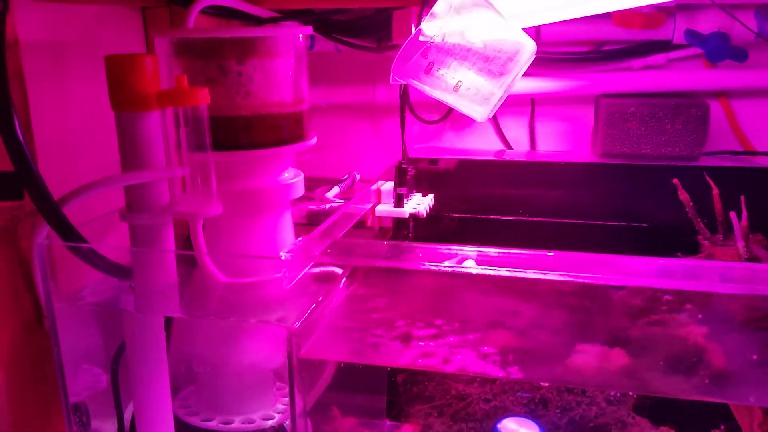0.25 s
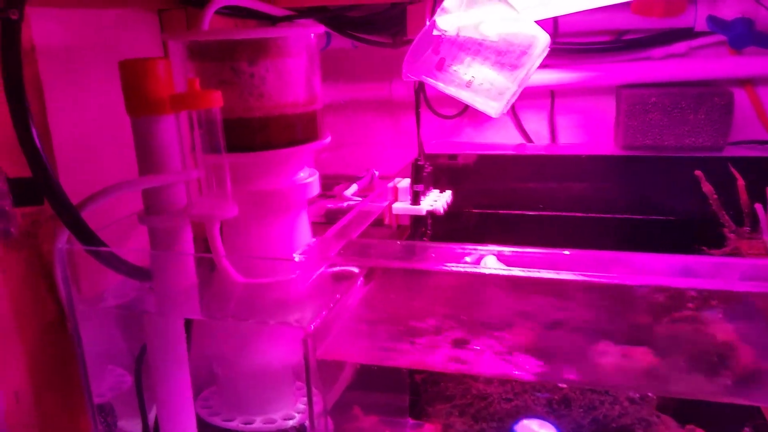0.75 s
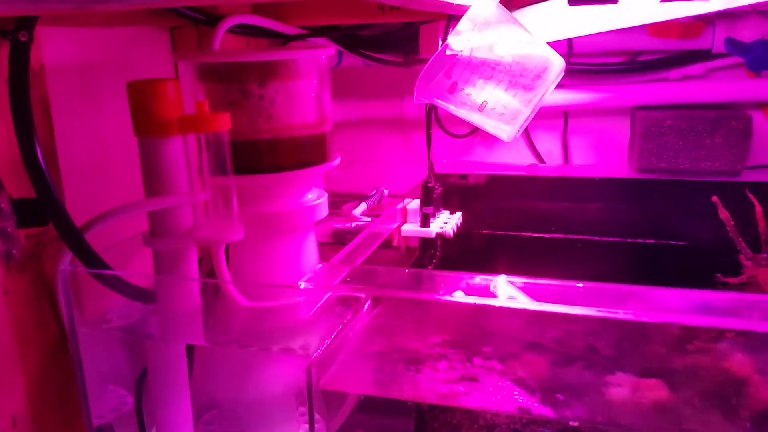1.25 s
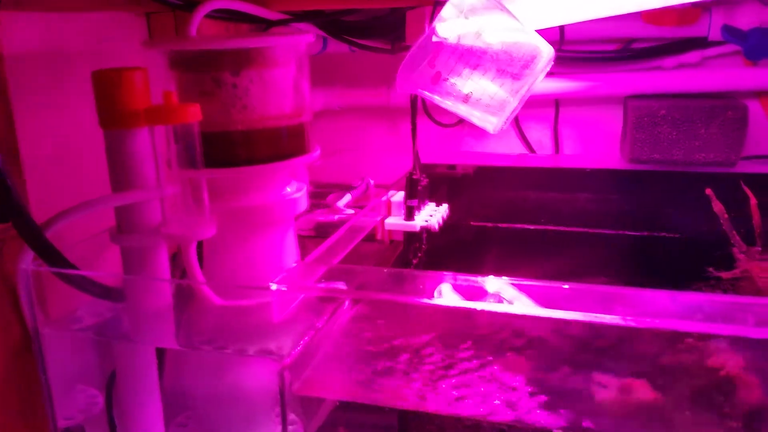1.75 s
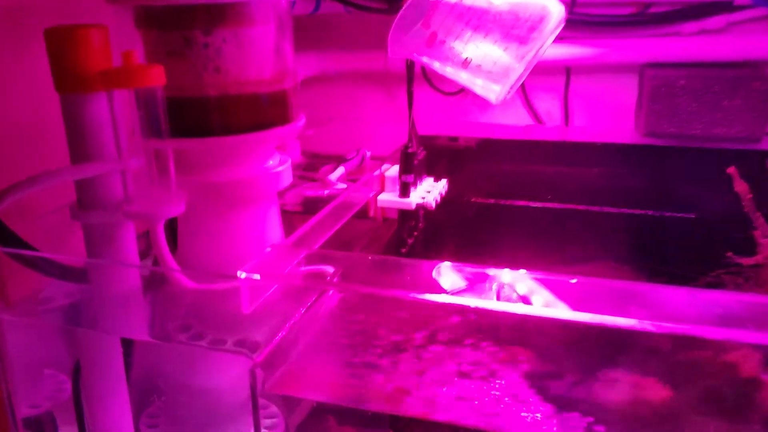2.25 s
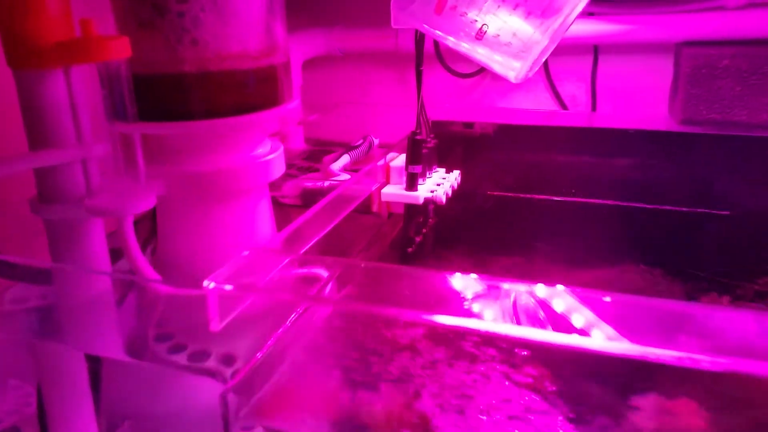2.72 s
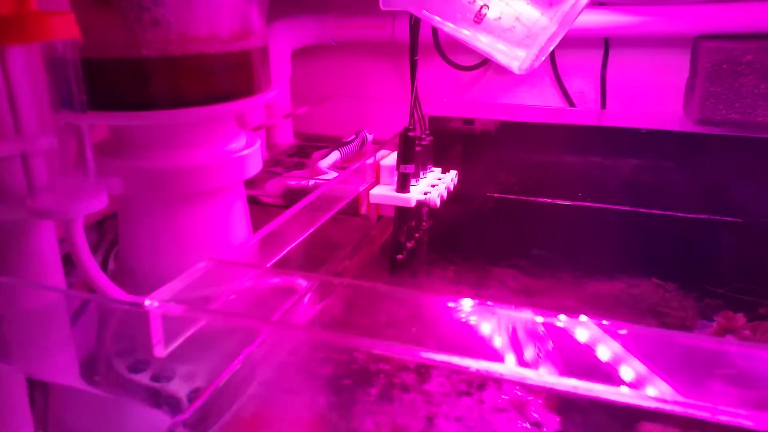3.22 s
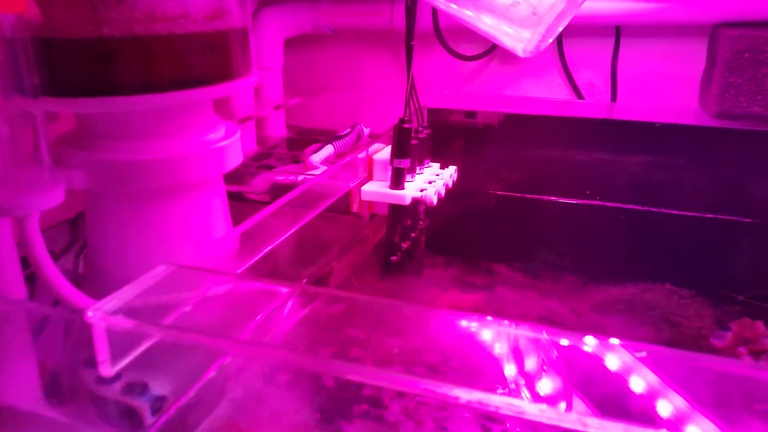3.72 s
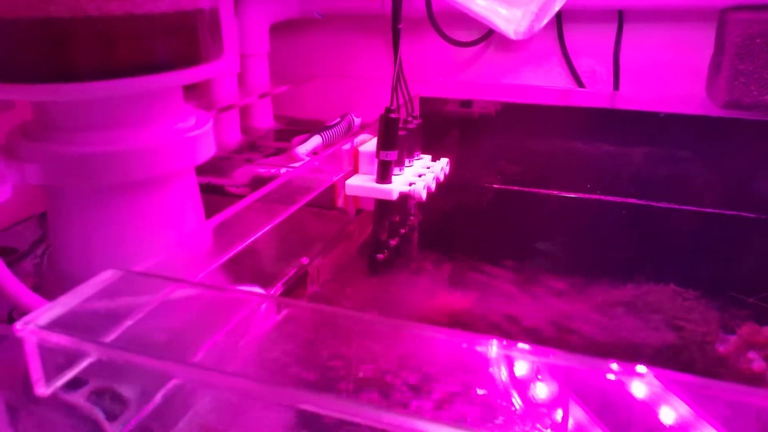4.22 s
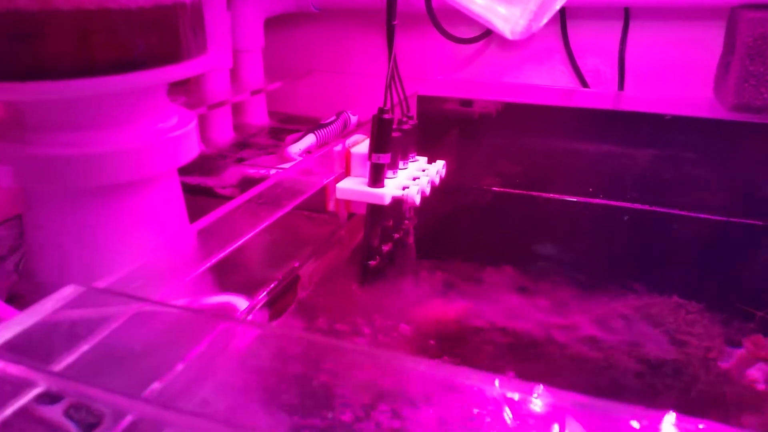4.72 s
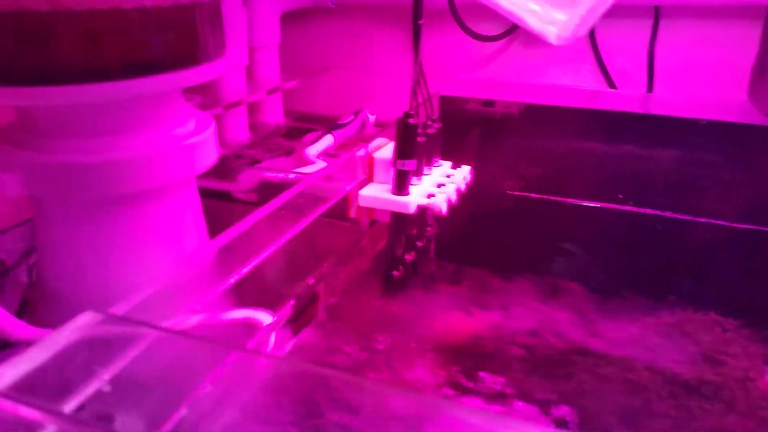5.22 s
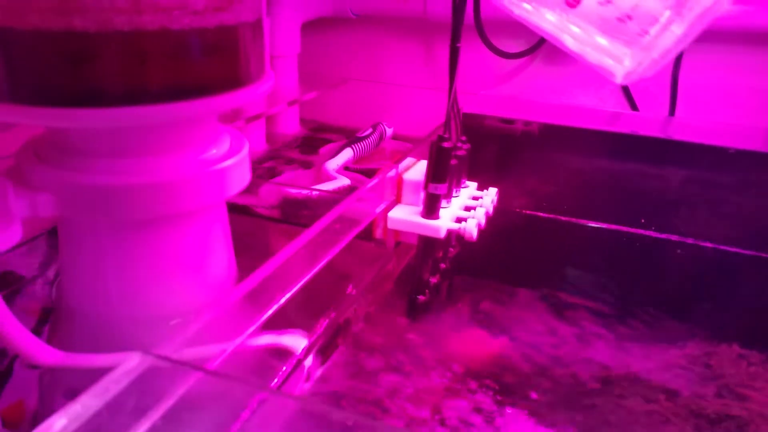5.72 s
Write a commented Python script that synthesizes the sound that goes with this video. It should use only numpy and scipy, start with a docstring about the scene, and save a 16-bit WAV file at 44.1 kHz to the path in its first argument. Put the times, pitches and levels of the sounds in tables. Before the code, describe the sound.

Water bubbles and fizzes in an aquarium sump over a steady pump hum, broken by a sharp click and soft handling bumps.

```python
"""An aquarium sump in its cabinet, heard from a hand-held camera that moves in towards the water.
From the start a mains pump and a skimmer pump beat under a thin fan tone, water churns, bubbles and
fizzes, and the skimmer's air intake hisses on the left. After one second a finger knocks the right
microphone, and everything sinks for about a second. The water then goes on growing, and from three
seconds on the drain gulps air, among clear plops and soft bumps of the hand on the camera."""
import sys
import numpy as np
from scipy import signal
from scipy.fft import rfft, irfft
from scipy.io import wavfile
from scipy.ndimage import uniform_filter1d, minimum_filter1d

SR = 44100
rng = np.random.default_rng(int(sys.argv[2]) if len(sys.argv) > 2 else 0)


def wrap_up_sound(samples):
    """Save the sound to the file named by the first command line argument, as 16-bit audio."""
    columns = np.atleast_2d(samples).T
    # keep every value between -1 and 1, then stretch to whole-number steps
    tamed = np.clip(columns, -1, 1)
    steps = np.round(tamed * 32767).astype(np.int16)
    wavfile.write(sys.argv[1], SR, steps)


N = 263277
TIME, FREQS = np.arange(N) / SR, np.fft.rfftfreq(N, 1 / SR)

# Rotor partials: (multiple of rotor speed [-], relative left level [dB], relative right level [dB])
MAINS_PARTIALS = [(2, 14, 13.5), (3, -2.5, 5.5), (4, -5, -11)]
SKIMMER_PARTIALS = [(2, 4.8, -3.5), (3, 12.7, 10)]
WHINE_PARTIALS = [(12.0, -1, -3), (15.1, -20, -19), (21, -15, -29), (21.95, -16, -18), (24, -15, -10),
                  (25, -10.5, -11.5), (26.05, -8.5, -16), (27, -13, -16), (39.1, -13, -14)]  # the skimmer's high orders
FAN_PARTIALS = [(1, -4.5, -2.5), (2, -16, -20), (3, -7.5, -10.5)]
# Noise spectral densities: (frequency [Hz], relative left level [dB], relative right level [dB])
RUMBLE_SPECTRUM = [(8, -24, -31), (22, -6.5, -28), (40, -13, -9), (67.4, 1, -3), (93, -11, -1.5),
                   (146, -2, -4), (167.5, -4.5, -3), (223, -17, -17), (343, -18, -17.5), (417, -33.5, -24),
                   (710, -67, -79)]
CHURN_SPECTRUM = [(152, -23, -21), (260, 9, -5), (346, 3, -0.5), (423, -10.5, 2.5), (487, 4.5, -4),
                  (622, 2, 2.5), (697, 0.5, -7.5), (1090, 3.5, -3), (1220, 3.5, -2.5), (1600, 0, -0.5),
                  (1640, -16, 2.5), (1700, 4.5, -1), (2220, -9.5, -7.5), (3550, -27, -36.5)]
INTAKE_SPECTRUM = [(1950, -33, -46), (2370, -14, -34), (2410, -8, -20), (2930, -8.5, -23), (3580, -25, -33),
                   (3733, -13, -23), (4104, -1, -28), (4490, 1, -28), (4960, -3.5, -20), (5510, -11, -38),
                   (6660, -74, -66), (12000, -53, -48)]
FIZZ_SPECTRUM = [(1500, -8, -26), (2560, 1.5, -2.5), (3420, 1, -9), (4120, -1.5, -2), (5420, 8, -10),
                 (6450, 1, -9.5), (7480, -7.5, -15.5), (8820, -6, 0), (9350, 2.5, -2), (11200, -0.5, 9),
                 (12900, 0.5, 1.5), (16000, -4.5, 2)]
# Likeness of the two microphone signals: (frequency [Hz], signed coherence [-])
COHERENCE = [(30, -0.4), (60, 0.66), (110, 0.34), (160, 0.87), (270, 0.52), (450, 1), (740, 0.28),
             (1220, -0.58), (2010, -0.059), (3300, -0.0041)]
# Spits of spray: (time [s], level [dB])
SPRAY_SPITS = [(0.382, -58), (5.517, -52)]
# Gulps of air in the drain: (time [s], peak level [dB])
DRAIN_GULPS = [(3.266, -22), (4.016, -27), (4.942, -24), (5.542, -22), (5.763, -21.5)]
# Single ringing bubbles: (time [s], peak level [dB], frequency [Hz])
BUBBLE_PLOPS = [(3.115, -47, 468), (3.164, -48.5, 1320), (4.015, -46, 727), (5.464, -40, 1067),
                (5.827, -46, 1320), (5.828, -48, 2010)]
# Hand on the camera body: (time [s], level before filtering [dB])
HAND_BUMPS = [(0.5006, -6.5), (1.413, -18), (3.913, -5), (3.964, -7), (4.666, -7), (5.798, -9.5)]
# Finger on the right microphone: (time [s], level before filtering [dB], rise [s], length [s])
FINGER_KNOCKS = [(0.9877, -15, .00004, 0.014), (1.0216, 12.5, 0.00006, 0.0045)]

MAINS_HZ, SKIMMER_HZ, FAN_HZ = 60, 44.56, 580.5
APPROACH_DB_PER_S, DIP_DB = 1.15, -12.5  # each layer takes its own multiple of these


def amp(db):
    """Amplitude ratio: tenfold for every 20 dB."""
    return 10 ** (np.asarray(db) / 20)


def unit_rms(x):
    """Normalisation to a mean power of 1."""
    return x / np.sqrt(np.mean(x ** 2) + 1e-20)


def spectrum(table):
    """Interpolation of a table's columns along a logarithmic frequency axis."""
    hz, *columns = np.transpose(table)
    return np.array([np.interp(np.log(FREQS + 1), np.log(hz + 1), column) for column in columns])


def add(mix, start_s, sound):
    """Superposition: a sound adds to the mix from start_s on."""
    part = mix[:, round(start_s * SR):][:, :sound.shape[-1]]
    part += sound[..., :part.shape[1]]


def drift(rate_hz):
    """Random modulation: noise of rms 1, low-passed at about rate_hz."""
    low_pass = np.exp(-(FREQS / rate_hz) ** 2) * (FREQS > 0)
    return unit_rms(irfft(rfft(rng.standard_normal(N)) * low_pass, N))


def coloured(pair, colour):
    """Partial coherence: two independent noises are blended, then spectrally shaped."""
    left, independent = rfft(pair)
    coherence = np.clip(spectrum(COHERENCE)[0], -1, 1)
    right = coherence * left + np.sqrt(1 - coherence ** 2) * independent
    return unit_rms(irfft(np.array([left, right]) * amp(spectrum(colour)), N))


def dip_depth(start_s=1.027, step=0.16, fall_s=0.53, hold_s=0.29, recover_s=0.33):
    """Envelope of the dip at the knock, 0 to 1: step, linear fall, hold, exponential recovery."""
    age = TIME - start_s
    fall = (age > 0) * (step + (1 - step) * np.clip(age / fall_s, 0, 1))
    return fall * np.exp(-np.maximum(age - fall_s - hold_s, 0) / recover_s)


def level(end_db, near, dip, leftward=0):
    """Level rises as distance shrinks; near and dip weight the approach and the brief drop."""
    approach_db = APPROACH_DB_PER_S * (TIME - TIME[-1])
    approach_weight = near + leftward * np.array([[1], [-1]])
    return amp(end_db + approach_weight * approach_db + dip * DIP_DB * dip_depth())


def rotor(speed_hz, partials, wander, flutter_db, flutter_hz, lag_s):
    """Rotor tones lock to the shaft speed; water on the blades modulates frequency and amplitude."""
    turns = np.cumsum(speed_hz * (1 + wander * drift(2.96))) / SR
    lag = np.array([[lag_s], [0]])  # the sound reaches the left microphone later
    out = np.zeros((2, N))
    for order, left_db, right_db in partials:
        tone = np.sin(2 * np.pi * (order * (turns - speed_hz * lag) + rng.random()))
        out += np.sqrt(2) * amp([[left_db], [right_db]]) * tone * amp(flutter_db * drift(flutter_hz))
    return out


def turbulence(colour, per_s, spread_db, burst_db, surge_db, surge_hz):
    """Turbulent flow radiates broadband noise with tiny uneven bursts, surging as a whole."""
    impulses = (rng.random((2, N)) < per_s / SR) * rng.choice([-1, 1], (2, N))
    sizes = amp(spread_db * np.minimum(rng.exponential(1, (2, N)), 4))
    drive = rng.standard_normal((2, N)) + amp(burst_db) * unit_rms(impulses * sizes)
    return coloured(drive, colour) * amp(surge_db * drift(surge_hz))


def spray(hz, width_hz, half_s):
    """Fine spray spits a high band of noise under short Gaussian envelopes."""
    band = np.exp(-((FREQS - hz) / width_hz) ** 2)
    envelope = sum(amp(db) * np.exp(-((TIME - s) / half_s) ** 2) for s, db in SPRAY_SPITS)
    return envelope * unit_rms(irfft(rfft(rng.standard_normal((2, N))) * band, N))


def slosh(boost_db, delay_s, half_s):
    """Amplitude modulation of the churn: each gulp stirs the water in proportion to its size."""
    return 1 + sum(amp(boost_db + db) * np.exp(-((TIME - s - delay_s) / half_s) ** 2)
                   for s, db in DRAIN_GULPS)


def bubble(hz, cycles, glide, onset):
    """An air pocket is a damped oscillator whose pitch rises as it nears the surface."""
    age = np.arange(int(5 * cycles / hz * SR)) * hz / (SR * cycles)  # in decay time constants
    phase = 2 * np.pi * cycles * (age + glide * age ** 2 / 2)
    ring = np.sin(phase) * np.exp(-age) * (1 - np.exp(-age / onset))
    return ring / abs(ring).max()


def bubbling(per_s, low_hz, high_hz, cycles, spread_db, size_count=40):
    """Bubbles resonate at random all over the surface; larger ones ring lower and louder."""
    out = np.zeros((2, N))
    for hz in np.geomspace(low_hz, high_hz, size_count):
        births = rng.random(N) < per_s / size_count / SR
        strengths = amp(spread_db * np.minimum(rng.exponential(1, N), 3.5))
        pan = rng.uniform(0.1, 0.76)
        rings = signal.oaconvolve(births * strengths, bubble(hz, cycles, glide=0.035, onset=0.037))[:N]
        out += np.array([[np.cos(pan)], [np.sin(pan)]]) * rings * (low_hz / hz) ** 0.67
    return unit_rms(out)


def gulps_and_plops():
    """Damping sets the ring: heavy in the drain's deep gulps, light in the clear plops."""
    out = np.zeros((2, N))
    for s, db in DRAIN_GULPS:
        add(out, s, amp(db) * bubble(hz=115.8, cycles=0.94, glide=0.005, onset=0.81))
    for s, db, hz in BUBBLE_PLOPS:
        add(out, s, amp(db) * bubble(hz, cycles=13.5, glide=0.0156, onset=0.04))
    return out


def push(db, rise_s, length_s, side):
    """Contact makes a one-way pressure pulse, shared between left (side 0) and right (side 1)."""
    t = np.arange(4096) / SR
    pulse = (1 - np.exp(-(t / rise_s) ** 2)) * np.exp(-(t / length_s) ** 4)
    return amp(db) * np.array([[1 - side], [side]]) * pulse


def touches(bass_cuts_hz, overload_db, port_hz, port_loss, top_lift):
    """Transient response: the microphone's bass cut swings each pulse back; the hardest overloads it."""
    pressure = np.zeros((2, N))
    for s, db, rise_s, length_s in FINGER_KNOCKS:
        add(pressure, s, push(db, rise_s, length_s, side=1))
    for s, db in HAND_BUMPS:
        add(pressure, s, push(db, rise_s=0.0019, length_s=0.0055, side=0.055))
    cuts = np.vstack([signal.butter(1, hz, "high", fs=SR, output="sos") for hz in bass_cuts_hz])
    clipped = np.clip(signal.sosfilt(cuts, pressure), -amp(overload_db), amp(overload_db))
    # the microphone's port lifts the very top and absorbs a wide treble band below it
    lifted = clipped + top_lift * np.diff(clipped, axis=1, prepend=0)
    return lifted - port_loss * signal.lfilter(*signal.iirpeak(port_hz, 1, fs=SR), lifted)


def scene():
    """Superposition: water and pumps grow on approach, the fan barely, the intake not at all."""
    hum = rotor(MAINS_HZ, MAINS_PARTIALS, wander=0.0003, flutter_db=1.0, flutter_hz=5, lag_s=0.0003)
    hum += rotor(SKIMMER_HZ, SKIMMER_PARTIALS, wander=0.0008, flutter_db=1.4, flutter_hz=8, lag_s=0.0003)
    whine = rotor(SKIMMER_HZ, WHINE_PARTIALS, wander=0.0007, flutter_db=1.3, flutter_hz=8, lag_s=0.0003)
    fan = rotor(FAN_HZ, FAN_PARTIALS, wander=0.0005, flutter_db=1.8, flutter_hz=5, lag_s=0.0001)
    rumble = turbulence(RUMBLE_SPECTRUM, per_s=60, spread_db=4, burst_db=-8, surge_db=1.5, surge_hz=9.1)
    churn = turbulence(CHURN_SPECTRUM, per_s=350, spread_db=3.5, burst_db=-4.5,
                       surge_db=1.02, surge_hz=27)
    churn *= slosh(boost_db=17, delay_s=0.0082, half_s=0.012)
    bubbles = bubbling(per_s=130, low_hz=280.1, high_hz=1862, cycles=7.7, spread_db=4.5)
    gurgle = bubbling(per_s=70, low_hz=429, high_hz=492.5, cycles=23, spread_db=5.5, size_count=8)
    intake = turbulence(INTAKE_SPECTRUM, per_s=2200, spread_db=-4, burst_db=-4.5,
                        surge_db=0.7, surge_hz=12)
    fizz = turbulence(FIZZ_SPECTRUM, per_s=2600, spread_db=5.5, burst_db=-5.5, surge_db=1, surge_hz=38)
    sump = (hum * level(end_db=-49.0, near=0.92, dip=0.91)
            + whine * level(end_db=-49.0, near=1.51, dip=0.91, leftward=0.26)
            + fan * level(end_db=-54.8, near=0.25, dip=1.25)
            + rumble * level(end_db=-37.5, near=0.88, dip=0.49)
            + churn * level(end_db=-47.5, near=0.62, dip=1.11)
            + bubbles * level(end_db=-57.5, near=0.29, dip=0.75)
            + gurgle * level(end_db=-50.0, near=3.16, dip=0.74)
            + intake * level(end_db=-51.0, near=0, dip=0.96)
            + fizz * level(end_db=-46.5, near=1.65, dip=1.49))
    handling = touches(bass_cuts_hz=(115, 20), overload_db=8, port_hz=6950, port_loss=0.84, top_lift=0.35)
    return sump + spray(hz=10200, width_hz=1800, half_s=0.025) + gulps_and_plops() + handling


def record(dry):
    """Look-ahead limiting ducks both channels around the knock; a low-pass then limits the band."""
    ceiling, release_db_per_s, edge_hz = 0.93, 260, 15900
    over_db = np.maximum(20 * np.log10(abs(dry).max(0) / ceiling + 1e-9), 0)
    ahead_db = -minimum_filter1d(-over_db, size=861, origin=-430)
    release_db = TIME * release_db_per_s
    duck_db = uniform_filter1d(np.maximum.accumulate(ahead_db + release_db) - release_db, size=100)
    low_pass = signal.firwin(511, edge_hz, window=("kaiser", 9), fs=SR)
    return signal.oaconvolve(dry * amp(-duck_db), low_pass[None], "same")


dry = scene()
out = record(dry)
wrap_up_sound(out)
```